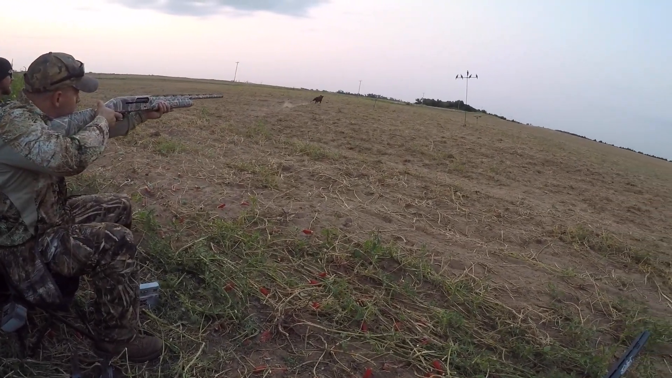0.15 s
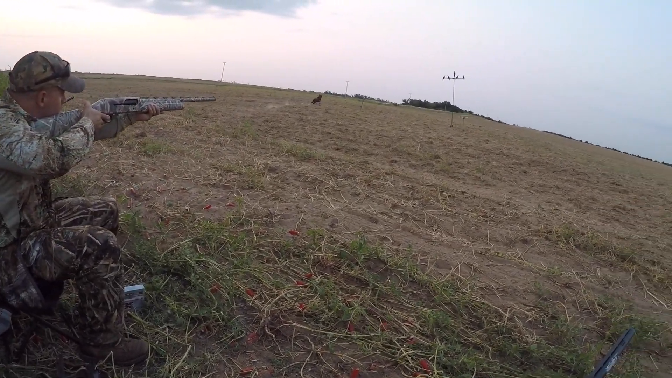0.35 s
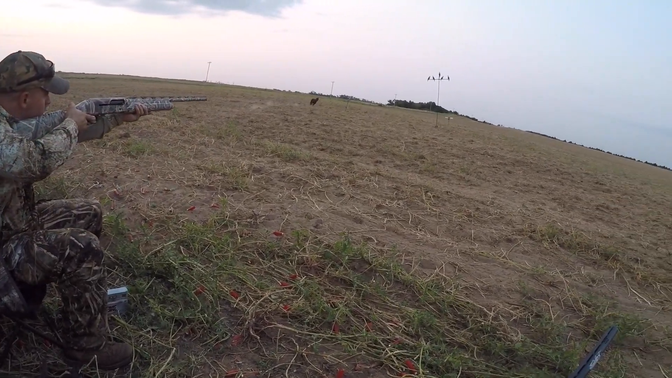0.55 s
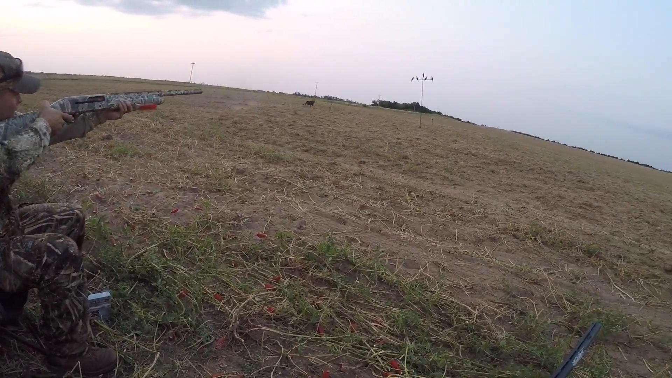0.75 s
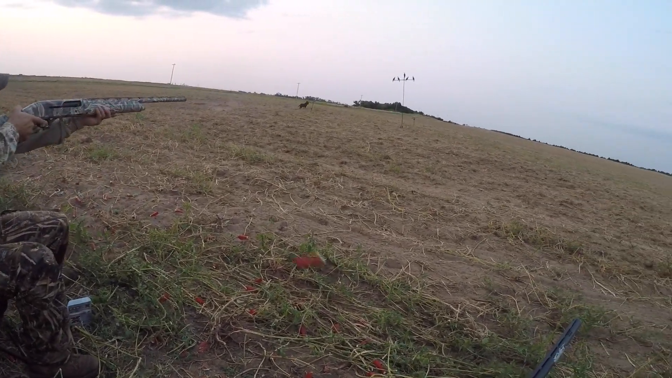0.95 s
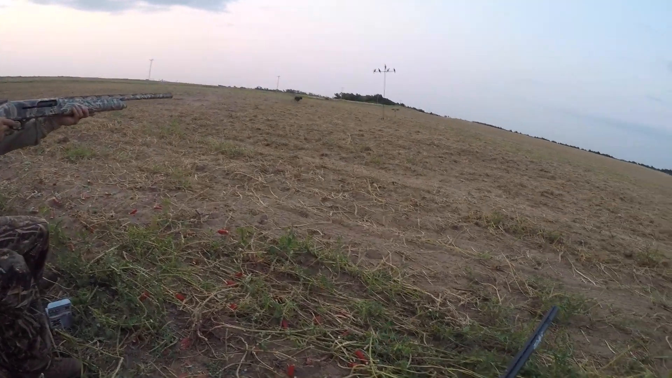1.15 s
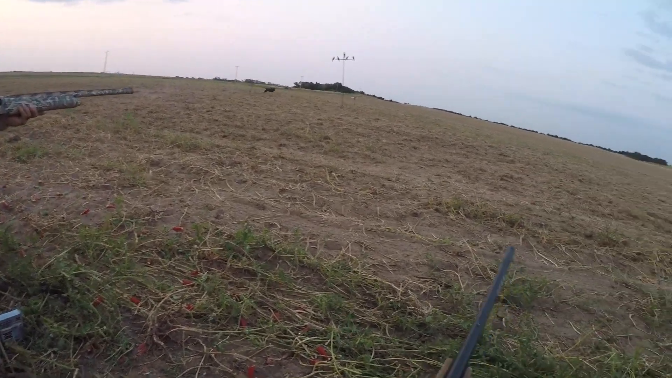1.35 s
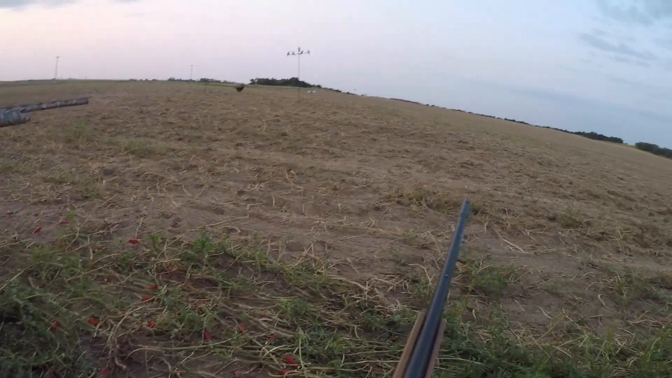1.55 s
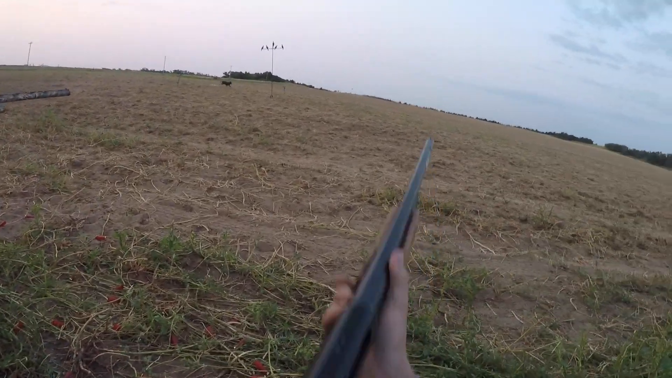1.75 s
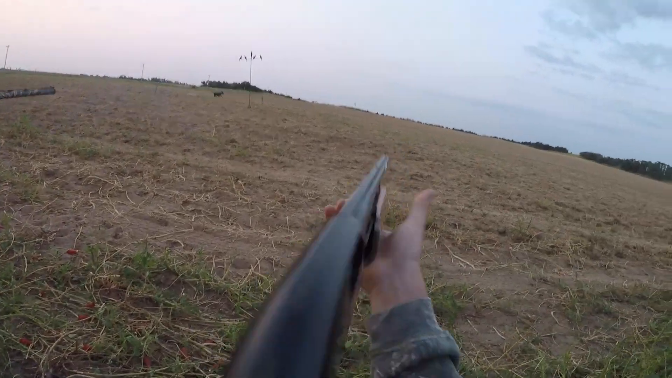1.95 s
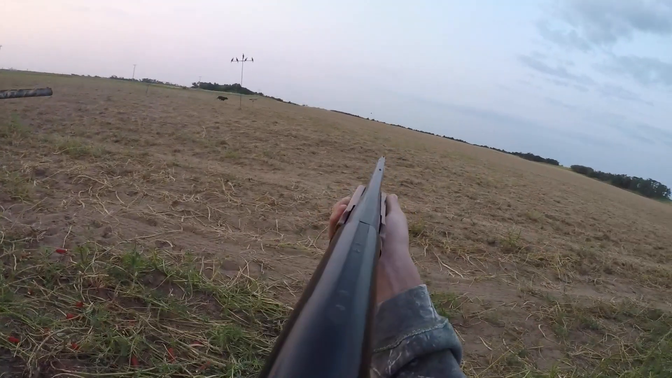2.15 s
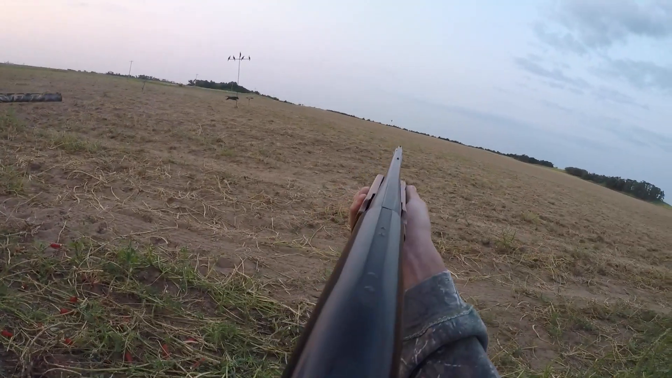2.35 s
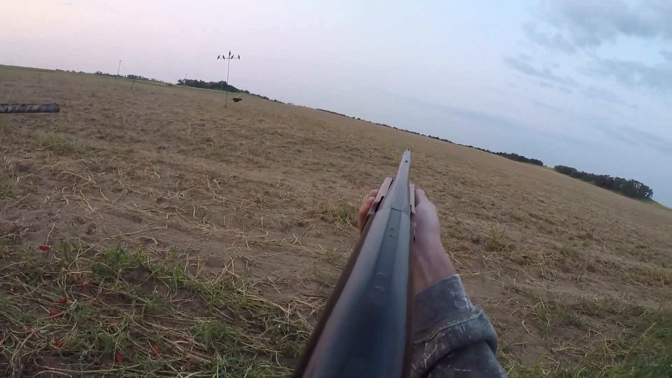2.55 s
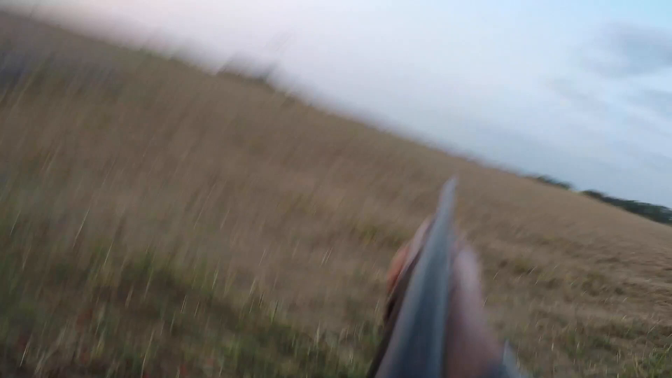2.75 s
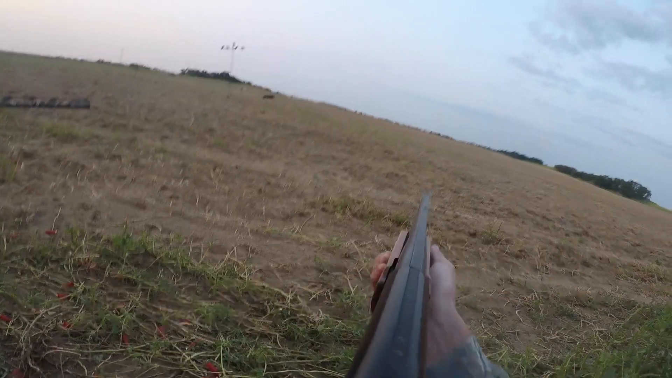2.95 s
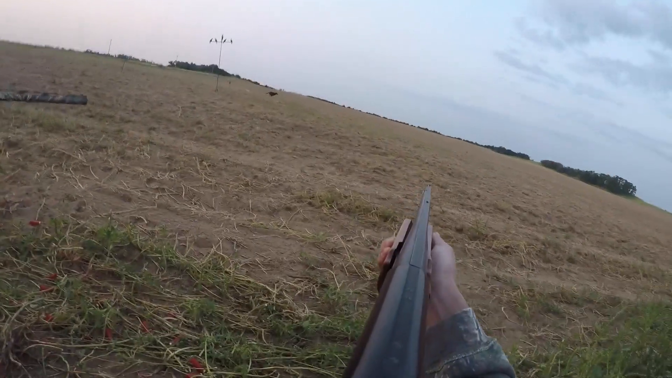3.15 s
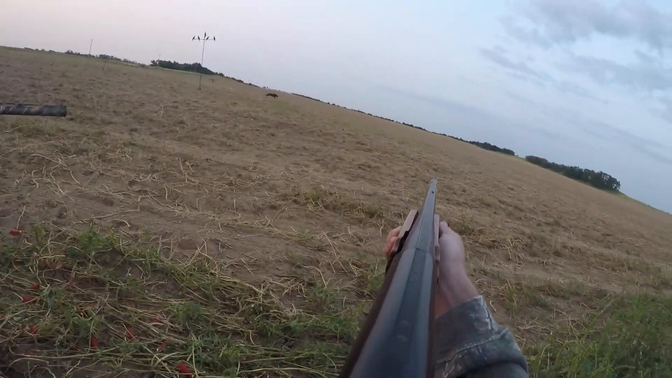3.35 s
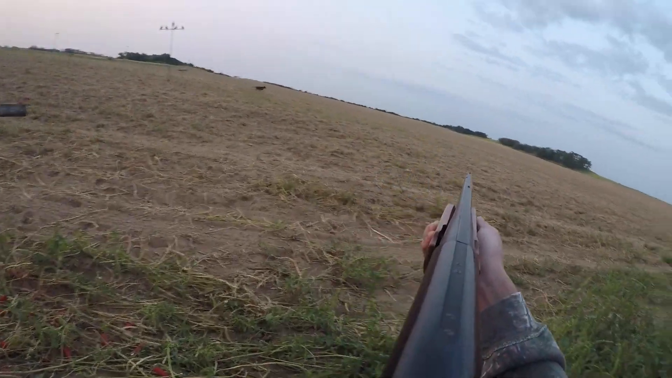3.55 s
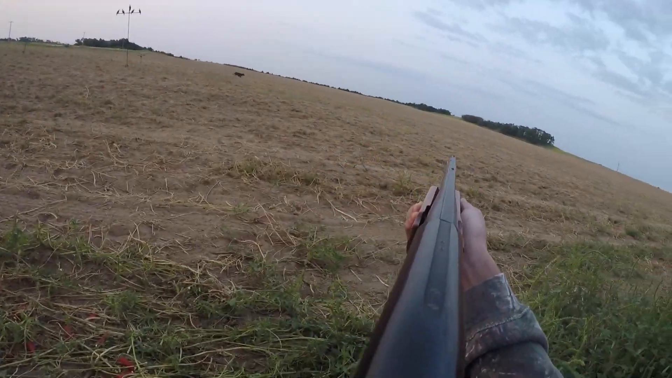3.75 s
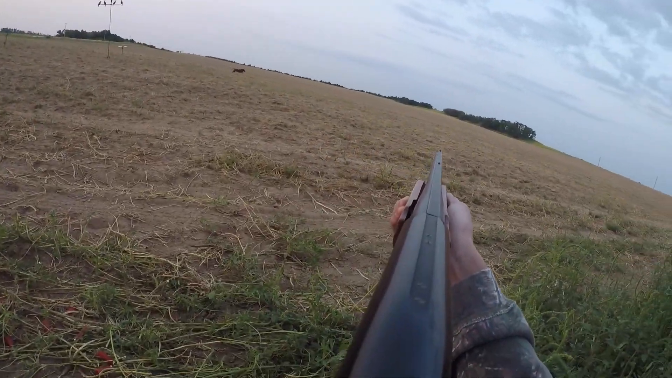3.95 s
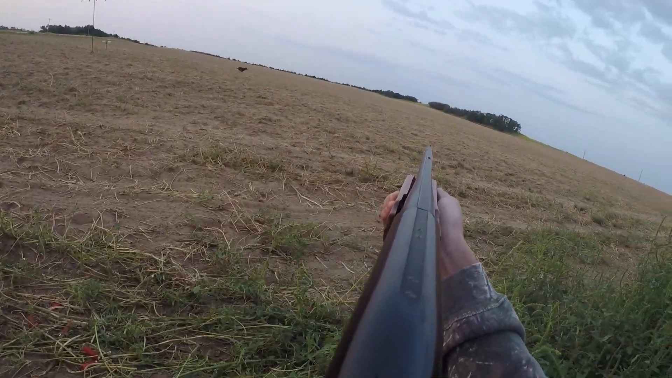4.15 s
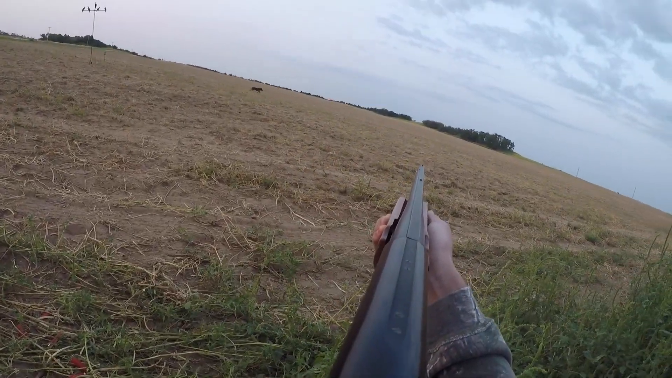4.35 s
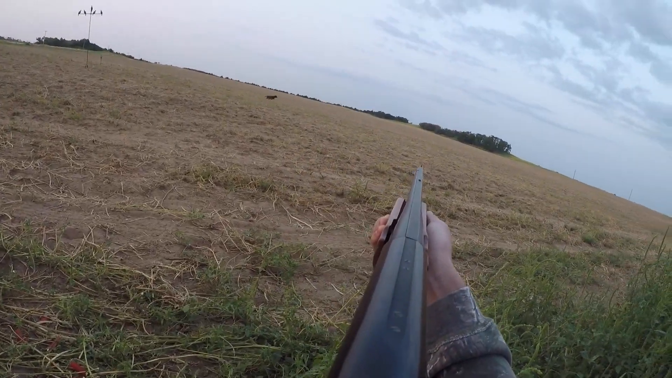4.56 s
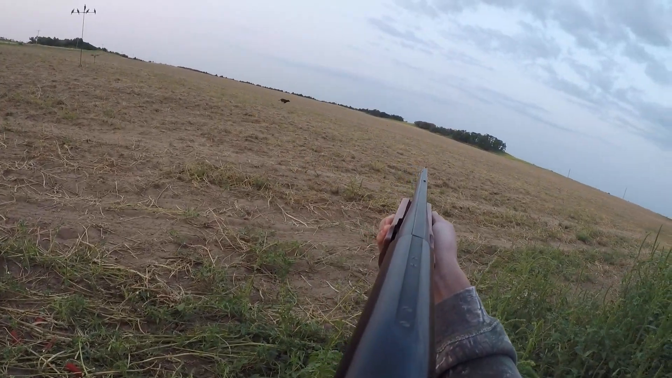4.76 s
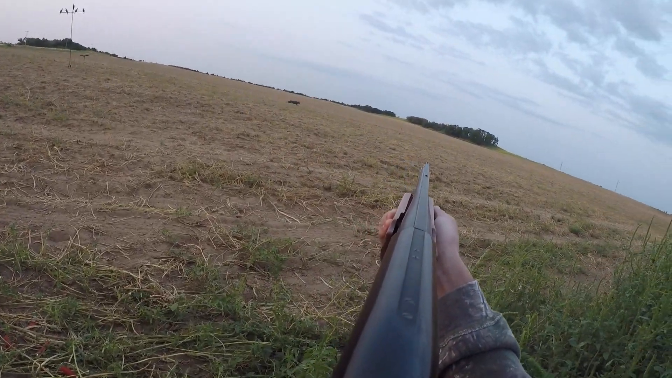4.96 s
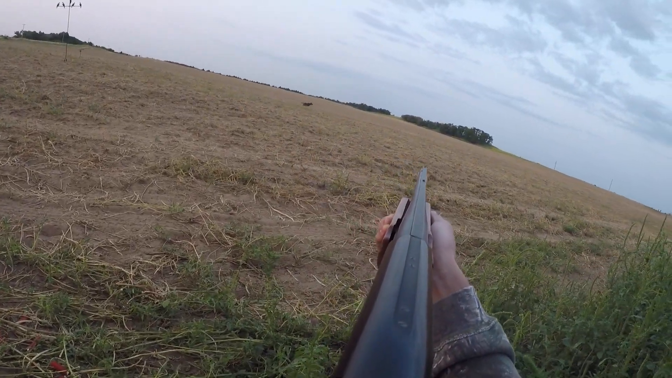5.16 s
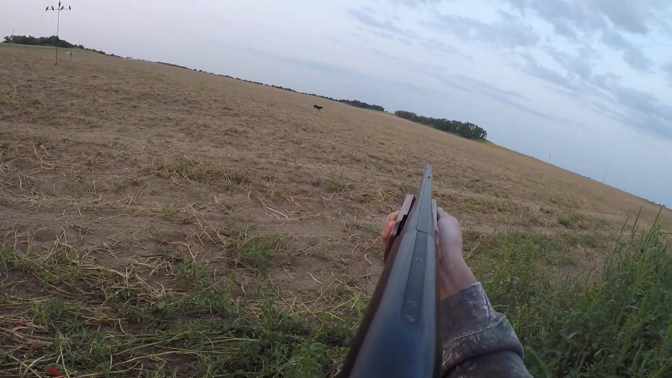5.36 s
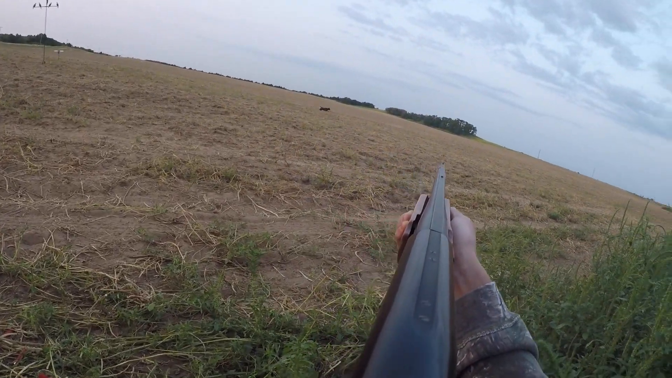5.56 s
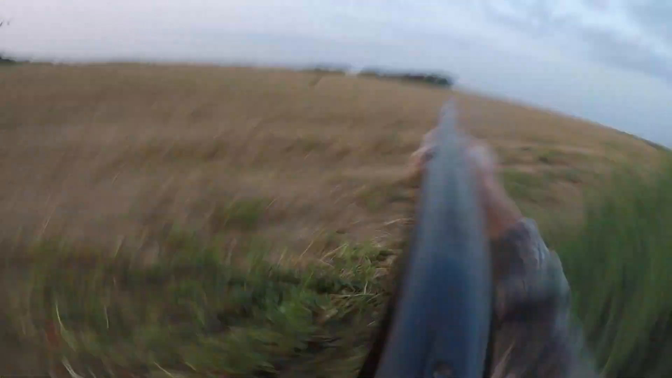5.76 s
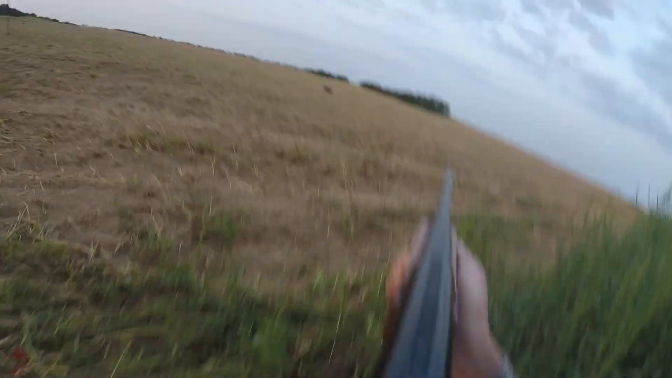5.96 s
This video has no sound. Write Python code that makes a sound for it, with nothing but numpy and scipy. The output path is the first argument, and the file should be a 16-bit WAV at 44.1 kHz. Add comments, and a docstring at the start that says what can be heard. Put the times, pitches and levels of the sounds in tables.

```python
"""An open stubble field: shotguns fire beside a small pair of microphones.
Noise cracks, dull or bright, ride on pressure pushes; fainter, duller repeats lead up to them.
Buzzes made of many sines swell, sag or creep up for a moment and stop dead; then hiss and rumble fade.
Gun parts clack as noise puffs, shells tinkle as sines, cloth brushes, air bumps the microphones, birds chirp
as sliding sines, insects sing in thin bands. The tables let wind, rustle and air noise sink after blasts."""
import sys
import numpy as np
from scipy import signal
from scipy.fft import rfft, irfft
from scipy.io import wavfile

SR = 44100
rng = np.random.default_rng(int(sys.argv[2]) if len(sys.argv) > 2 else 0)


def transcribe(u):
    """Save the signal u as a 16-bit wav file named by the first command-line argument.

    u: samples, shape (n,) or (channels, n), limited to [-1, 1]; the rate is SR.
    q: integer samples, one column per channel.
    """
    v = np.clip(np.atleast_2d(u).T, -1, 1)
    q = np.round(v * 32767).astype(np.int16)
    wavfile.write(sys.argv[1], SR, q)


N = 264189   # length in samples, about 6 s


def from_db(db):
    """Turn decibels into a gain."""
    return 10 ** (np.asarray(db) / 20)


def rms_one(x):
    """Scale a sound to an rms (average strength) of 1."""
    return x / np.sqrt(np.mean(x ** 2) + 1e-20)


def in_time(rows):
    """Draw the columns of a table as curves, one value per sample."""
    s, *columns = np.transpose(rows)
    return [np.interp(np.arange(N) / SR, s, c) for c in columns]


def add(out, sound, s):
    """Mix a stereo sound in, starting at s seconds."""
    at = round(s * SR)
    out[:, at:at + sound.shape[1]] += sound[:, :N - at]


def drift(rate_hz):
    """Wander slowly at random with an average strength of 1; a higher rate wanders faster."""
    steps_per_s = 60
    steps = rng.standard_normal(int(N / SR * steps_per_s) + 2)
    memory = np.exp(-2 * np.pi * min(rate_hz, 25) / steps_per_s)
    slow = signal.lfilter([1], [1, -memory], steps)
    return np.interp(np.arange(N) / SR * steps_per_s, np.arange(len(slow)), rms_one(slow))


def coloured(spectrum, size):
    """Make two unrelated noises (mid and side) with a given balance of pitches, together of rms 1."""
    hz = np.maximum(np.arange(size // 2 + 1) * SR / size, 1)
    points = np.array(spectrum)
    shape = from_db(np.interp(np.log(hz), np.log(points[:, 0]), points[:, 1]))
    return rms_one(irfft(rfft(rng.standard_normal((2, size))) * shape, size))


def spread(pair, unlike, pan_db=0):
    """Turn mid and side into left and right: more side makes the two ears less alike."""
    unlike = np.clip(unlike, 0, 1)
    mid = np.sqrt(1 - unlike / 2) * pair[0]
    side = np.sqrt(unlike / 2) * pair[1] * [[1], [-1]]
    return (mid + side) * from_db([[pan_db / 2], [-pan_db / 2]])


def width_at(s):
    """Tell how unlike the two channels of the background are at a time."""
    # stereo width, narrowing after blasts: t/s, unlikeness/0-1
    width = [(0, 0.8), (.55, 0.76), (.85, 0.39), (1.1, 1), (1.8, 0.8), (1.98, 0.6), (2.9, .4), (3.5, 0),
             (4.95, 0), (5.5, 0.51), (5.99, .6)]
    return np.clip(np.interp(s, *np.transpose(width)), 0, 1)


def resonate(x, hz, width_hz):
    """Let one band of pitches ring, with a gain of 1 at its middle."""
    r = np.exp(-np.pi * width_hz / SR)
    feedback = [1, -2 * r * np.cos(2 * np.pi * hz / SR), r * r]
    return signal.lfilter(np.array([1, 0, -1]) * (1 - r * r) / 2, feedback, x)


def burst(peak_db, hz, rise_s, t60, top_hz, sharpness, air_db, body_db):
    """Puff noise, mid and side, through a ringing band, a body and a broad band that is dull above its top."""
    # colour from the ground and the gun: f/Hz, width/Hz, level/dB
    body_bands = [(405, 100, -2.5), (730, 250, -4), (1747, 430, -0.5), (3070, 760, -7.5)]
    t = np.arange(2600) / SR   # cut off after 59 ms
    attack = np.minimum(t / rise_s, 1) ** 2
    fall = from_db(-60 * np.maximum(t - rise_s, 0) / t60)
    puff = rng.standard_normal((2, len(t))) * fall * attack
    band = signal.butter(3, [500, min(top_hz, 16000)], "band", fs=SR, output="sos")
    broad = signal.sosfilt(band, puff)
    body = sum(from_db(db + body_db) * resonate(puff, mid, width) for mid, width, db in body_bands)
    air = from_db(air_db) * (top_hz / 8000) ** 3.0 * puff
    sound = resonate(puff, hz, hz / sharpness) + from_db(-9) * broad + body + air
    return from_db(peak_db) * sound / np.abs(sound[0]).max()


def cracks():
    """Puff noise, dull or bright, each on a short push of pressure."""
    # cracks, with fainter, duller repeats about 10.7 ms apart leading up to them:
    # t/s, peak before panning/dB, ring f/Hz, time to fall 60 dB/s, left over right/dB,
    # thump level before its decay/dB, thump f/Hz
    crack_rows = [(0.6744, -22, 3905, .02, 1, -47, 299), (0.684, -33, 3377, 0.037, -1.5, -33, 607),
                  (0.6951, -17, 3700, 0.028, -4, -13, 830), (0.7051, -6, 3608, 0.054, 8, -8, 826),
                  (0.7134, -2.5, 4194, 0.0051, 12, -10.5, 202), (0.716, 0, 3640, 0.014, -10, -3, 173),
                  (1.8818, -28.5, 4286, 0.006, -5, -46, 305),
                  (1.9034, -16.5, 3312, 0.0049, -2, -18.5, 804.4), (1.914, -10.5, 4150, 0.036, 1, -8, 794),
                  (1.9217, -4.5, 4500, 0.0072, 0, -12, 498), (1.9244, 4, 4300, 0.0049, 4, -12.5, 144),
                  (2.6863, -39, 3320, 0.0059, 0.5, -45, 299),
                  (2.708, -27.5, 3300, 0.014, 1.5, -30.5, 506.5),
                  (2.719, -8.5, 3267, 0.0078, 3.5, -21, 436.2), (2.725, -2, 5363, 0.0055, -4, -16.5, 314),
                  (2.729, 4, 5170, .0067, 0, -19.5, 110), (2.8078, -5, 1657, 0.007, -5.5, -10, 127.1),
                  (2.811, -24.5, 3033, 0.034, 11, -14, 291.7), (4.855, 0.5, 6500, 0.013, -4, -1, 131),
                  (4.861, -12.5, 3000, 0.026, 1, -6.5, 202), (5.7486, -31, 1800, 0.011, -2, -46, 300),
                  (5.7876, -1.5, 1580, .011, -3, -10, 212), (5.7919, 0, 4640, 0.0078, 0.5, -11, 128)]
    wider = 1.3   # than the background
    out, t = np.zeros((2, N)), np.arange(2600) / SR
    for s, peak_db, hz, t60, pan_db, thump_db, thump_hz in crack_rows:
        top_hz = 7600 + 59.5 * peak_db   # louder cracks reach higher
        cycles = 0.36 + thump_hz / 450   # higher thumps ring for more cycles
        push = from_db(thump_db) * np.sin(2 * np.pi * thump_hz * t) * np.exp(-t * thump_hz / cycles)
        puff = burst(peak_db, hz, .0011, t60, top_hz, sharpness=7.4, air_db=-24, body_db=3.5)
        add(out, spread(puff, wider * width_at(s), pan_db) + push, s)
    return out


def buzz(curve, modes, unlike):
    """Stack sines at half-odd multiples of a rate, as if a grain repeats with its sign flipped each time."""
    stutter_hz = 93.75
    hz = (np.arange(160) + .5) * stutter_hz
    ringing = sum(from_db(db) / (1 + (2 * (hz - mid) / width) ** 2) for mid, width, db in modes)
    gains = ringing + from_db(-43.0) / (1 + (hz / 11000) ** 4)
    start_s, end_s = curve[0][0], curve[-1][0]
    t = np.arange(round((end_s - start_s) * SR)) / SR
    pair = []
    for _ in ("mid", "side"):
        phases = 2 * np.pi * (np.outer(hz, t) + rng.random((len(hz), 1)))
        pair.append(gains @ np.sin(phases))
    level = from_db(np.interp(t + start_s, *np.transpose(curve)))
    out = np.zeros((2, N))
    add(out, level * spread(rms_one(np.array(pair)), unlike), start_s)
    return out


def buzzes():
    """Buzz around the blasts: each swells steadily, then sags or creeps up for a moment and stops dead."""
    # buzzes: fully swollen at t/s, level then/dB, swell rate/dB per s, time until the stop/s,
    # change by then/dB, unlikeness/0-1
    buzz_rows = [(.712, -21, 900.5, 0.015, -11, 0.16), (1.918, -23, 901, 0.009, -13, .2),
                 (2.725, -25.5, 899.5, 0.0068, -11, .2), (4.827, -10, 2200, .027, 8, 0),
                 (5.781, -16, 1300, .01, 5.5, 0.15)]
    # what the first three, the fourth and the fifth buzz ring with: f/Hz, width/Hz, level/dB
    ring_near = [(140, 70, 3.5), (776, 1000, -1.5), (3600, 6300, -9.5), (7570, 110, -9.5)]
    ring_long = [(140, 56, -7), (235, 40, 0.5), (327, 40, -12), (431, 69, -9), (720, 200, -29),
                 (2250, 150, -18), (3200, 200, -27), (4450, 41, -15.5), (4770, 110, -4), (5190, 93, -18.5),
                 (6430, 93, -18), (8100, 100, -35.5), (8600, 200, -20), (11000, 400, -49.5)]
    ring_short = [(137, 75, -6.5), (517, 240, -19), (1800, 590, -15), (2940, 240, -20), (4550, 740, -22.5),
                  (6510, 770, -22.5), (8290, 220, -20)]
    swell_db, stop_s, stop_db = 35, 0.0016, 48   # height of the swell; time and depth of the stop
    out = 0
    for row, modes in zip(buzz_rows, [ring_near] * 3 + [ring_long, ring_short]):
        s, level_db, swell, wait, change_db, unlike = row
        end_s, end_db = s + wait, level_db + change_db
        curve = [(s - swell_db / swell, level_db - swell_db), (s, level_db),
                 (end_s, end_db), (end_s + stop_s, end_db - stop_db)]
        out = out + buzz(curve, modes, unlike)
    return out


def tails():
    """Echo off the ground and far trees: hiss fades, treble fastest, while rumble rolls in a little later."""
    # echoes: t/s, hiss level/dB, time for the lower hiss to fall 60 dB/s, rumble level/dB
    tail_rows = [(0.72, -40.5, .41, -30.5), (1.927, -40.5, .2, -39), (2.732, -41, .23, -42.5),
                 (2.812, -34.5, 0.26, -42.5), (4.861, -28, .2, -39), (5.795, -36.5, 0.17, -41.5)]
    # balance of the hiss: f/Hz, relative level per Hz/dB
    hiss_spectrum = [(530, -37), (900, -8.5), (1010, -4.5), (1420, -9.5), (1750, -6.5), (3540, -9),
                     (4440, -4), (15500, -28)]
    rumble_rise_s, rumble_t60_s = 0.035, .53
    out, t = np.zeros((2, N)), np.arange(SR // 2) / SR   # each ends after half a second
    low_pass = signal.butter(1, 4500, fs=SR, output="sos")
    rumble_band = signal.butter(5, [109, 330], "band", fs=SR, output="sos")
    for s, hiss_db, hiss_t60, rumble_db in tail_rows:
        hiss = coloured(hiss_spectrum, size=len(t))
        dull = signal.sosfilt(low_pass, hiss)
        treble = hiss - dull
        hiss = dull * from_db(-60 * t / hiss_t60) + treble * from_db(-90 * t / hiss_t60)
        # scattered echoes come in lumps
        hiss *= from_db(1.2 * np.interp(t, t[::220], rng.standard_normal(len(t[::220]))))
        rumble = rms_one(signal.sosfilt(rumble_band, rng.standard_normal((2, len(t)))))
        rise = 1 - np.exp(-(t / rumble_rise_s) ** 2)
        rumble *= rise * from_db(rumble_db - 60 * t / rumble_t60_s)
        add(out, spread(from_db(hiss_db) * hiss, 0.76) + spread(rumble, .05), s)
    return out


def clicks():
    """Tick with short dry puffs where gun parts and gear touch; empty shells ring as fading sines."""
    # gun actions, shells and gear: t/s, peak before panning/dB, ring f/Hz, time to fall 60 dB/s,
    # left over right/dB
    click_rows = [(0.0636, -48, 4000, .025, -1), (0.098, -46.5, 1050, .028, 4),
                  (0.4235, -28.5, 3070, 0.062, 9.5), (0.7544, -40.5, 6900, .02, 14),
                  (0.7998, -38, 1900, 0.018, 4), (0.809, -44, 2800, .02, 0.5), (0.835, -44, 5100, 0.14, -7),
                  (0.865, -29.5, 5440, 0.057, 7.5), (1.1167, -51, 1100, 0.02, -8),
                  (1.194, -52, 1040, 0.037, -13), (1.2687, -45, 4020, .025, -11),
                  (1.289, -52, 1057, .025, -10), (1.3194, -50.5, 1170, .057, -14),
                  (1.5247, -43, 1860, 0.026, 2.5), (1.654, -36.5, 6900, .049, 5.5),
                  (2.069, -34.5, 1060, 0.075, 4.5), (2.132, -58, 4520, .015, 1),
                  (2.169, -50.5, 1397, .025, -3), (2.1838, -51, 2505, 0.027, -1),
                  (2.324, -53.5, 2500, .02, -3), (2.4219, -36.5, 1430, 0.015, -9),
                  (2.5555, -54.5, 1500, 0.014, -12), (2.8675, -27, 5480, 0.024, -14.5),
                  (2.873, -21, 3970, 0.027, -3), (2.8863, -36, 4330, .064, 9),
                  (2.9105, -34, 5650, .029, -13), (2.9242, -44, 5960, 0.034, 17),
                  (2.9448, -46, 1920, .025, -7), (2.9656, -51, 1460, .025, -18),
                  (2.9984, -43.5, 4240, .027, -7), (3.0282, -44, 5800, .025, -6),
                  (3.0351, -39.5, 2190, .029, 3), (3.046, -42, 6300, 0.043, -6),
                  (3.052, -34, 4300, .058, -10), (3.0766, -25, 4350, 0.085, 0.5),
                  (3.0852, -21.5, 4930, 0.03, -6), (3.09, -20, 3006, 0.026, -2.5),
                  (3.205, -60, 2890, .015, 2.5), (4.0897, -65, 1080, 0.038, 1.5),
                  (4.1694, -60, 1312, .023, 0.5), (4.2396, -58, 1213, 0.026, 0),
                  (5.2564, -55.5, 3530, .025, -4), (5.7007, -48, 5310, 0.031, -7),
                  (5.931, -41, 4250, 0.041, -11), (5.95, -48.5, 4500, .03, 1), (5.964, -29, 5200, 0.07, 11),
                  (5.9736, -26.5, 4470, 0.044, -18.5)]
    # empty shells ringing: t/s, level/dB
    tinkles = [(.427, -48), (1.527, -62.5), (1.657, -50.5)]
    # tones of one shell: f/Hz, relative level/dB, time to fall 60 dB/s
    shell_tones = [(6470, -6, 0.14), (7100, -4, 0.066), (7180, 3.5, 0.097)]
    out, t = np.zeros((2, N)), np.arange(4400) / SR   # shells ring for 0.1 s
    for s, peak_db, hz, t60, pan_db in click_rows:
        top_hz = 9500 + 55 * peak_db   # fainter contacts are duller
        tick = burst(peak_db, hz, 0.00026, t60, top_hz, sharpness=7.6, air_db=-25, body_db=-10.0)
        add(out, spread(tick, .25, pan_db), s)
    for s, level_db in tinkles:
        ring = sum(from_db(level_db + db - 60 * t / t60) * np.sin(2 * np.pi * hz * t)
                   for hz, db, t60 in shell_tones)
        add(out, np.outer([1, 1], ring), s)
    return out


def brushes():
    """Brush cloth and stubble: uneven grains of noise swell and fade in one soft stroke."""
    # strokes: t/s, level at the top of the stroke/dB, centre f/Hz, length (0.1 s at most)/s
    brush_rows = [(0.089, -53, 1500, 0.034), (1.285, -57, 1110, 0.061), (2.212, -64.5, 1530, 0.065),
                  (2.329, -64, 1397, 0.038), (2.504, -62.5, 1477, 0.031), (2.937, -68, 4130, 0.11),
                  (3.027, -48.5, 3530, 0.053), (3.302, -80.5, 2500, 0.037), (3.389, -75, 1094, 0.028),
                  (4.273, -61.5, 1287, 0.046), (4.357, -62.5, 872, 0.053), (5.324, -70.5, 1176, 0.064),
                  (5.432, -63, 1398, 0.043), (5.687, -62, 2450, 0.033), (5.907, -61.5, 4080, 0.064)]
    out = np.zeros((2, N))
    for s, level_db, hz, length in brush_rows:
        white = rng.standard_normal((3, 4400))[:, :round(length * SR)]
        unevenness = from_db(12.0 * white[2])
        grains = rms_one(resonate(white[:2] * unevenness, hz, hz / 3.4))
        stroke = from_db(level_db) * np.hanning(grains.shape[1])
        add(out, spread(grains, width_at(s)) * stroke, s)
    return out


def bumps():
    """Bump the microphone openings: gusts and knocks push the air, which swings back and settles."""
    # bumps: t/s, level before the decay/dB, f/Hz, swings to fall to about a third/cycles,
    # weakening on the left/0-1
    bump_rows = [(0.061, -29.5, 127, 0.78, 0), (1.633, -20, 95, 0.78, 0.15), (1.689, -25.5, 33, 2, 0.05),
                 (2.07, -27, 31, 2.13, 0.08), (2.733, -13.5, 49, 0.83, 0.9), (2.81, -18, 72, 0.6, 0.1),
                 (2.901, -28, 31, 1.5, 0), (3.088, -39.5, 270, 0.46, 0.1), (4.769, -26, 40, 1.9, 0),
                 (4.857, -15.5, 63, .7, .05), (4.864, -12, 10.4, 0.18, 0.23), (5.795, -18, 24, .4, 1)]
    out, t = np.zeros((2, N)), np.arange(SR // 4) / SR
    for s, level_db, hz, swings, weaker in bump_rows:
        push = from_db(level_db) * np.sin(2 * np.pi * hz * t) * np.exp(-t * hz / swings)
        add(out, np.outer([1 - weaker, 1], push), s)
    return out


def birds():
    """Chirp with sine notes that hold, then slide down in pitch, followed by faint echoes."""
    # chirps: t/s, peak before panning/dB, start f/Hz, length/s
    chirps = [(0.16, -61, 4000, .035), (0.259, -56.5, 4100, 0.032), (0.34, -60, 3950, .028),
              (0.375, -54, 4130, 0.048), (0.48, -51, 4220, 0.045), (0.528, -58, 3970, 0.047),
              (0.582, -50.5, 4170, .044), (0.603, -55, 4200, 0.035), (0.64, -58.5, 4040, .039),
              (1.108, -74.5, 4140, 0.034), (1.196, -70, 4250, .044), (1.305, -69, 4200, 0.044),
              (1.379, -75, 4300, .04), (1.4, -72, 4070, .04), (1.406, -71, 4380, .028),
              (1.5094, -70, 4020, 0.043), (1.7509, -73.5, 4050, 0.044), (1.84, -62, 4210, 0.039),
              (2.33, -80, 4040, 0.05), (2.437, -76.5, 4240, 0.036), (2.5394, -72, 4260, 0.041),
              (3.4094, -83, 4170, .044), (3.467, -87, 4000, .04), (3.578, -84, 4060, 0.04),
              (3.8394, -80, 4060, 0.038), (3.9294, -70.5, 4220, .04), (4.0375, -67.5, 4210, .042),
              (4.18, -77, 4100, 0.042), (4.3, -71, 4074, .044), (4.4294, -73, 4300, .03),
              (4.48, -63.5, 4080, .035), (4.563, -59, 4250, 0.045), (4.668, -58.5, 4230, 0.043),
              (5.316, -67, 4200, .03), (5.418, -69.5, 4220, .027)]
    # echoes of each chirp: delay/s, relative level/dB
    echoes = [(.011, -11), (.027, -15), (.052, -18)]
    full_fall_semitones, full_chirp_s = 3.0, .045   # shorter notes stop before falling this far
    out = np.zeros((2, N))
    for s, peak_db, hz, length in chirps:
        along = np.linspace(0, 1, round(length * SR))
        fall = full_fall_semitones * (along * length / full_chirp_s) ** 3
        phase = 2 * np.pi * np.cumsum(hz * 2 ** (-fall / 12)) / SR
        swell = np.sin(np.pi * along ** .8) ** .7
        pan_db = -12 * width_at(s)   # to the right, as far as the background is wide
        sides = from_db([pan_db / 2, -pan_db / 2])
        note = np.outer(sides, from_db(peak_db) * swell * np.sin(phase))
        add(out, note, s)
        for delay, echo_db in echoes:
            add(out, from_db(echo_db) * note, s + delay)
    return out


def far_insect():
    """Sing a thin, rough line far off: a sine that sags in pitch, roughened by slow noise."""
    # far insect: t/s, f/Hz, level/dB
    line = [(3.45, 8140, -100), (3.6, 8080, -90), (3.85, 8000, -88), (3.95, 7800, -88), (4.2, 7700, -98)]
    hz, level_db = in_time(line)
    rough = rms_one(signal.lfilter([1], [1, -.99], rng.standard_normal(N)))
    return from_db(level_db) * rough * np.sin(2 * np.pi * np.cumsum(hz) / SR)


def field():
    """Fill the field with noise: lumpy wind, low rustle, airy hiss, crackling stalks and a throbbing insect."""
    # background, sinking after blasts and creeping back: t/s, wind level/dB, rustle level/dB, air level/dB
    levels = [(0.0, -41, -51.5, -58), (0.55, -38, -48.5, -53.5), (0.73, -36, -40.5, -50),
              (0.85, -55.5, -44, -62.5), (1.02, -51.5, -66, -65), (1.55, -44, -49, -65),
              (1.75, -36.5, -58.5, -61), (1.98, -46, -48.5, -58), (2.19, -49.5, -63.5, -69.5),
              (2.72, -47.5, -64, -69), (2.83, -30.5, -39, -46), (2.92, -48, -57, -63.5),
              (3.15, -55, -77.5, -75.5), (3.52, -64.5, -74, -84), (3.77, -50, -69, -77),
              (4.45, -45.5, -54, -67), (4.75, -36.5, -57, -63), (4.92, -50, -51, -65.5),
              (5.19, -52.5, -68, -73.5), (5.55, -52, -66, -74), (5.76, -41.5, -63.5, -67.5),
              (5.91, -32, -51, -59), (5.99, -25.5, -48.5, -61)]
    # balance of wind, rustle and air: f/Hz, relative level/dB
    wind_spectrum = [(12, -30.5), (20, 7.5), (67, -0.5), (119, -20), (173, -23), (200, -22.5), (260, -61.5),
                     (440, -120)]
    rustle_spectrum = [(47, -37), (80, -6.5), (119, -8), (173, -10), (334, -20), (900, -42), (1170, -59.5),
                       (1980, -120)]
    air_spectrum = [(290, -28.5), (500, -1), (1580, -8), (3330, -14), (3960, -10.5), (4500, -15),
                    (5430, -16.5), (10200, -19.5), (12900, -27.5), (15500, -57.5)]
    insect_hz, insect_db, pulses_per_s = 5000, -19, 30   # level against the air, before throb and fading
    wind_db, rustle_db, air_db = in_time(levels)
    t = np.arange(N) / SR
    unlike = width_at(t)
    size = N + 3   # a length that is quick to transform

    gusts_db = 3 * drift(4)
    wind = spread(coloured(wind_spectrum, size)[:, :N], 0.57 * unlike) * from_db(wind_db + gusts_db)
    rustle = spread(coloured(rustle_spectrum, size)[:, :N], 0.66 * unlike)
    rustle = rustle * from_db(rustle_db + 3.1 * drift(8.1))
    air = spread(coloured(air_spectrum, size)[:, :N], 1.6 * unlike) * from_db(air_db + 0.44 * drift(8))

    crackle = rng.standard_normal(N) * from_db(6 * np.clip(drift(20), -2, 2))
    stalks = rms_one(resonate(resonate(crackle, 1400, 1300), 1400, 1100))

    throb = .75 + .25 * np.sin(2 * np.pi * pulses_per_s * t)
    song = resonate(resonate(rng.standard_normal(N), insect_hz, 70), insect_hz, 70)
    fading_db = 3 * drift(2.5)
    insect = rms_one(song) * throb * from_db(insect_db + fading_db)
    return wind + rustle + air + from_db(air_db) * (from_db(-11.0) * stalks + insect)


def scene():
    """Add up the blasts, their echoes, the handling of the guns and the field."""
    blasts = cracks() + buzzes() + tails()
    handling = clicks() + brushes() + bumps()
    return blasts + handling + birds() + far_insect() + field()


def record(dry):
    """Delay the right microphone's bass, round peaks towards full scale and cut the highest treble."""
    # how far the left leads below about 2 kHz: t/s, lead/samples
    bass_lead = [(0, 14.5), (2.5, 9.1), (2.65, 0.5)]
    late = np.interp(np.arange(N) - in_time(bass_lead)[0], np.arange(N), dry[1])
    low_pass = signal.butter(2, 2000, fs=SR, output="sos")
    right = dry[1] + signal.sosfiltfilt(low_pass, late - dry[1])   # swaps only the bass for its late copy
    both = np.array([dry[0], right])
    rounded = both / (1 + np.abs(both) ** 4) ** .25
    top_cut = signal.cheby2(12, 70, 16000, fs=SR, output="sos")   # 70 dB down from 16 kHz up
    return signal.sosfilt(top_cut, rounded)


dry = scene()
out = record(dry)
transcribe(out)
```